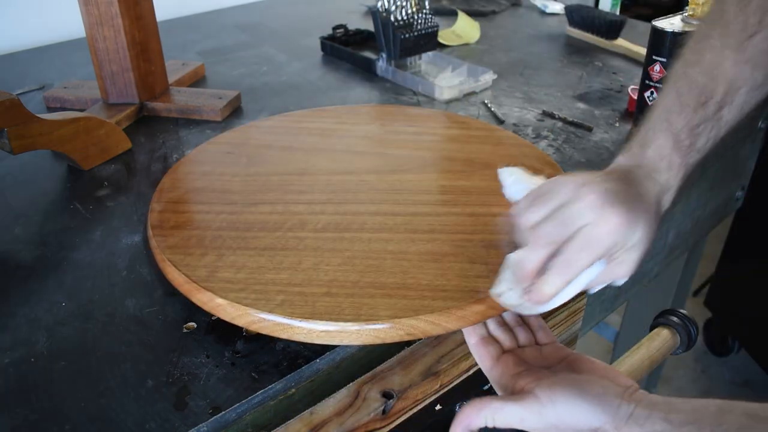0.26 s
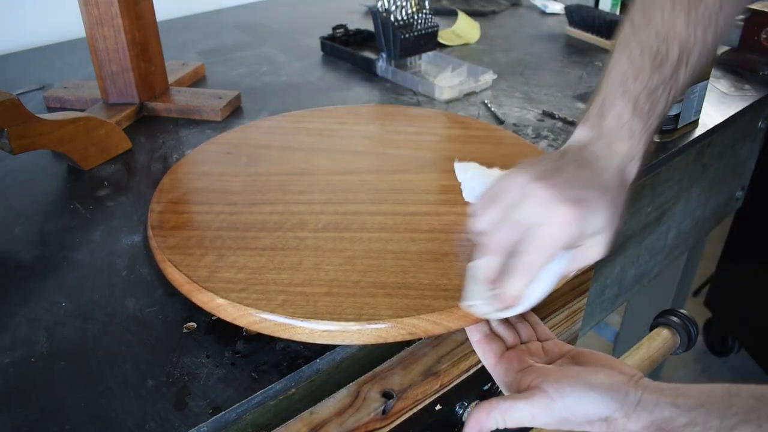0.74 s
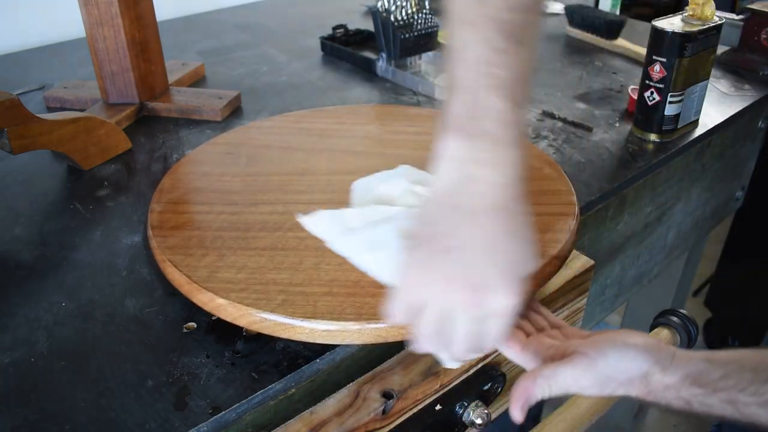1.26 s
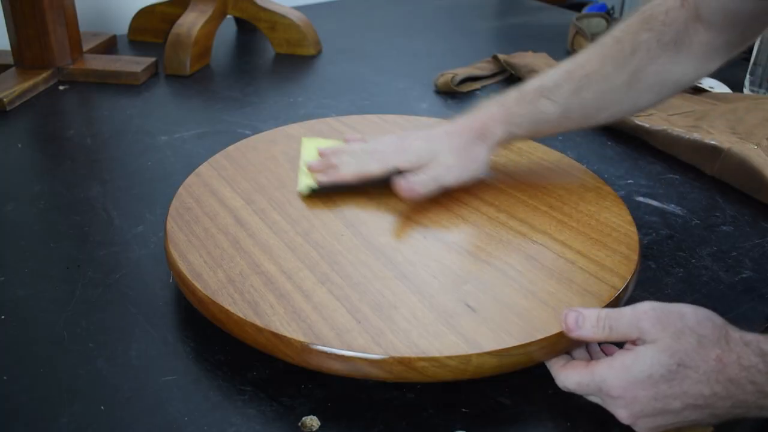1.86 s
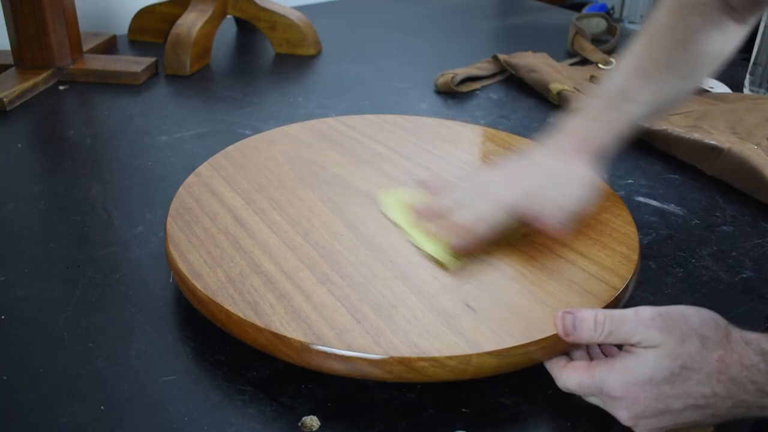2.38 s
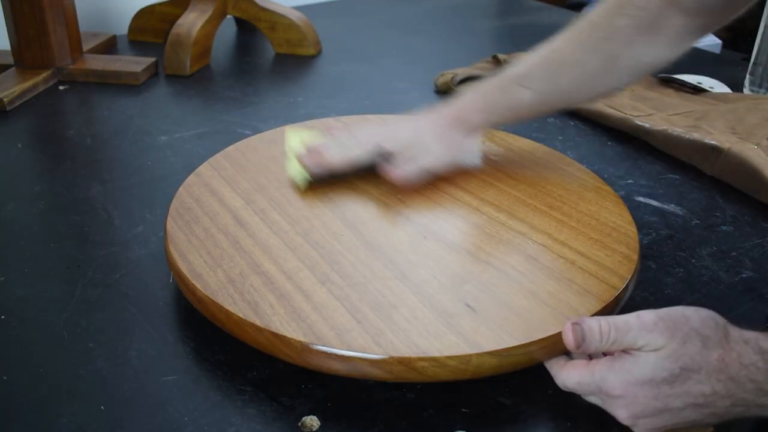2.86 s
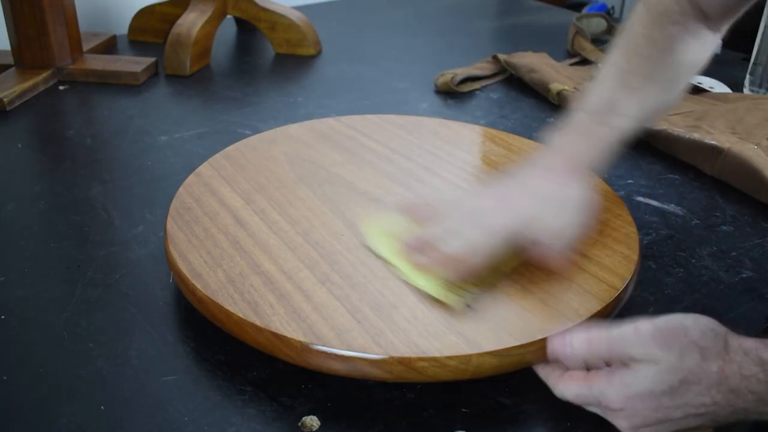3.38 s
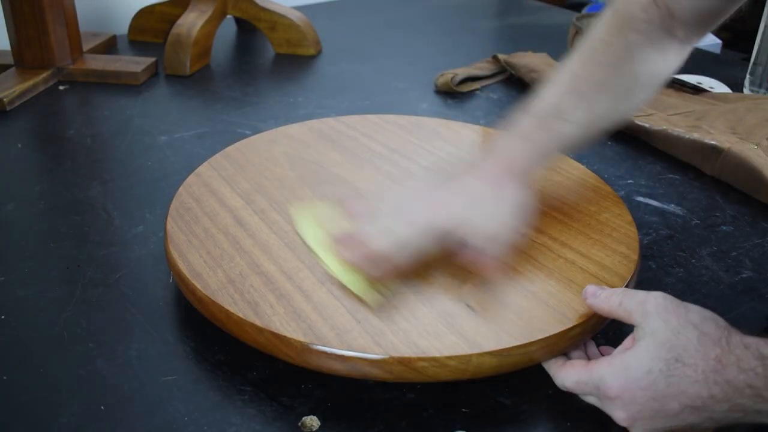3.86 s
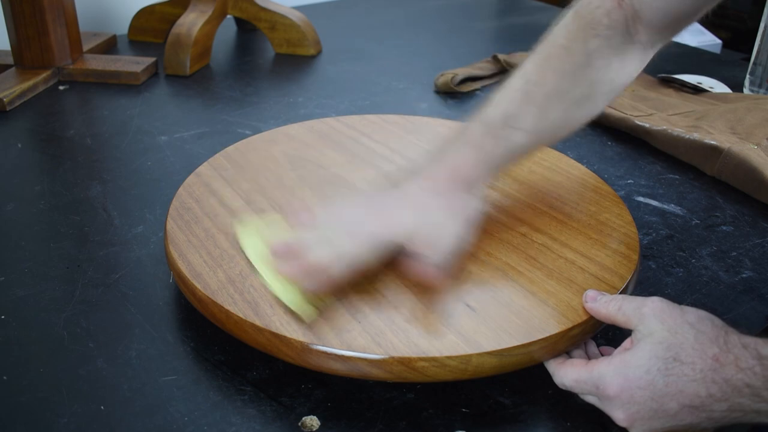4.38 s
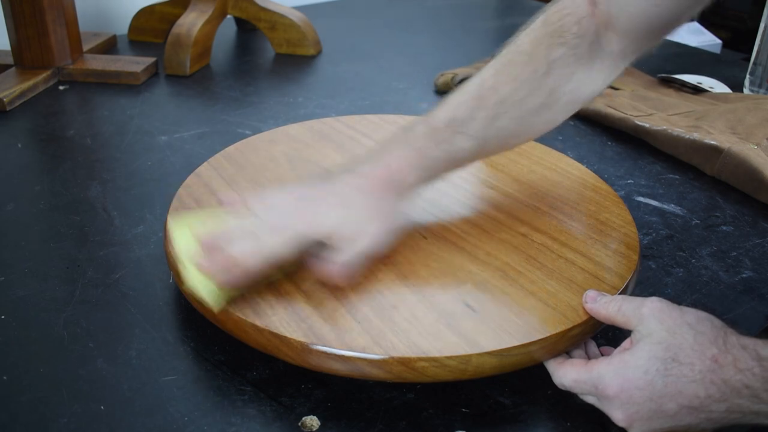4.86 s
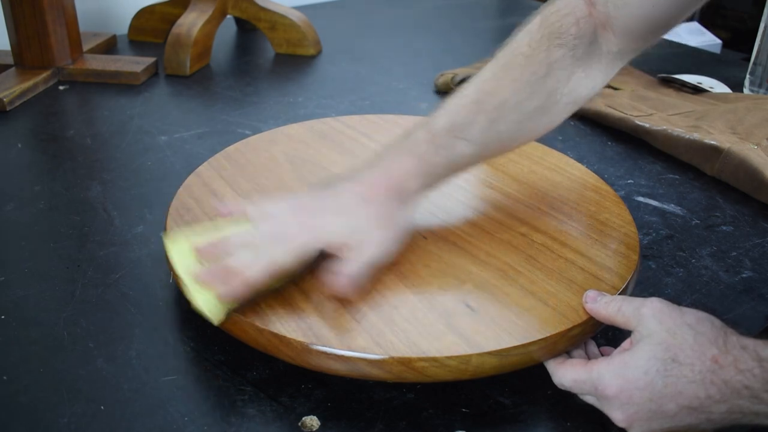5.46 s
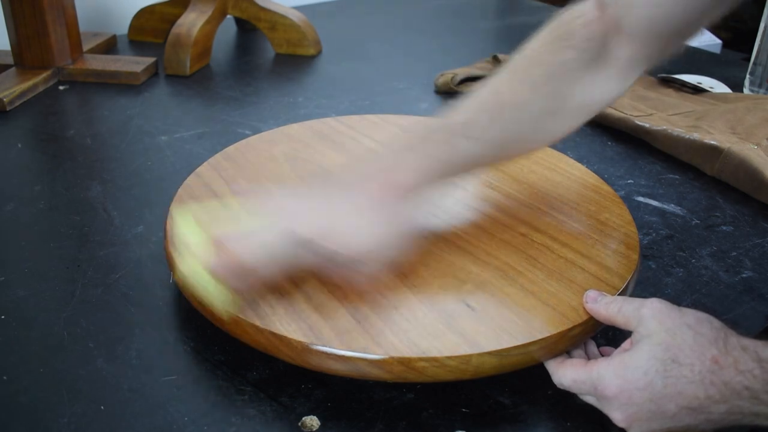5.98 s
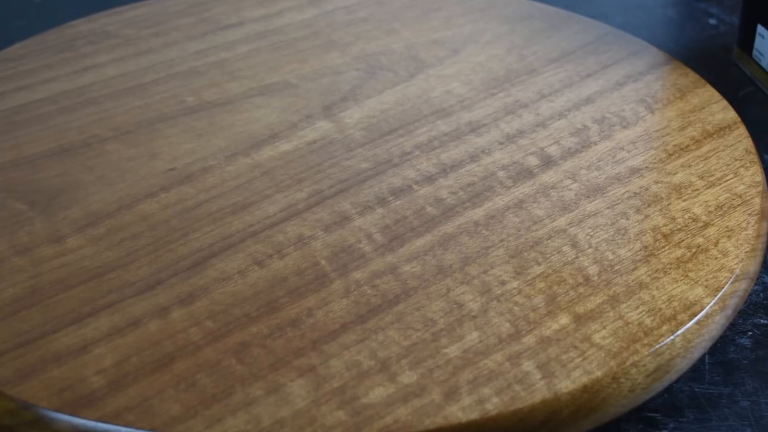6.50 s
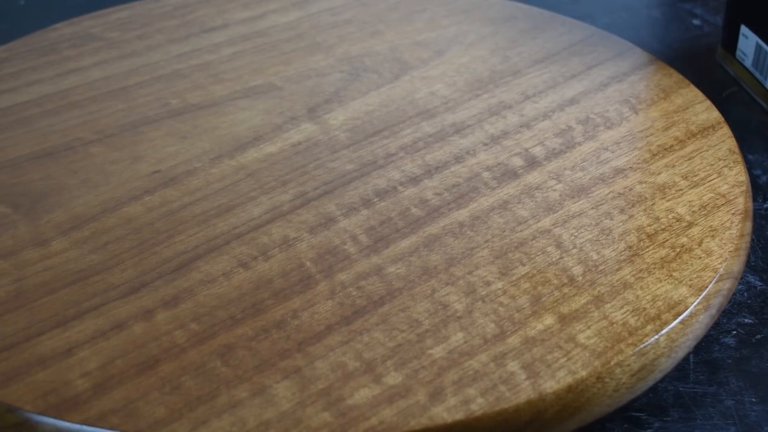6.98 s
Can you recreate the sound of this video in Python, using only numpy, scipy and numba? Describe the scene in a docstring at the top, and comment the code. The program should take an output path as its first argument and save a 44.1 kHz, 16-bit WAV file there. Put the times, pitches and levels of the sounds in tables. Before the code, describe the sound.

Close, dry sounds of wood being finished by hand in a workshop. First a cloth swishes briefly over a wooden board, which rumbles faintly and is bumped softly. Then comes about five seconds of light sanding: hissy strokes that quicken, dotted with tiny crunches of grit and a few soft knocks. The sanding stops abruptly and low room noise remains.

```python
"""A workshop, heard in three parts with sudden cuts between them. First a rag wipes finish over a round
wooden board on a turntable: its fibres catch and slip, which hisses and makes the board rumble. Then
fine sandpaper scuffs the board in quickening strokes, crushing loose grains. In both parts a hand
softly knocks the board. Last, only room and microphone hiss are left, on a small electrical offset."""
import sys
import numpy as np
from scipy import signal
from scipy.fft import rfft, irfft, next_fast_len
from scipy.io import wavfile
from scipy.ndimage import uniform_filter1d
from numba import njit

SR = 44100
rng = np.random.default_rng(int(sys.argv[2]) if len(sys.argv) > 2 else 0)


def dump(signal):
    """Clip the signal to [-1, 1] and save it as 16-bit WAV at the path in sys.argv[1]."""
    limited = np.clip(np.atleast_2d(signal).T, -1, 1)
    pcm = np.round(limited * 32767).astype(np.int16)
    wavfile.write(sys.argv[1], SR, pcm)


N = 319015
TIME = np.arange(N) / SR


def undb(db):
    return 10 ** (np.asarray(db) / 20)


def unit(x):
    return x / np.sqrt(np.mean(x ** 2))


def curves(table):
    """Join rows of (time, values...) with straight lines: one curve per value."""
    times, *columns = np.transpose(table)
    return [np.interp(TIME, times, column) for column in columns]


def colour(x, spectrum):
    """Shape x by (frequency [Hz], level [dB]) points, fading outside them; the result has strength 1."""
    hz, db = np.transpose(spectrum)
    size = next_fast_len(N)
    log_hz = np.log(np.maximum(np.fft.rfftfreq(size, 1 / SR), 1))
    outside = np.maximum(np.log(hz[0]) - log_hz, 0) + np.maximum(log_hz - np.log(hz[-1]), 0)
    gain = undb(np.interp(log_hz, np.log(hz), db) - 100 * outside)
    return unit(irfft(rfft(x, size) * gain, size)[:N])


@njit
def resonate(x, hz, width):
    """Let through a band `width` Hz wide around a pitch that may move."""
    y, mid, low = np.empty(len(x)), 0., 0.
    for i in range(len(x)):
        tuning, damping = np.tan(np.pi * hz[i] / SR), width / hz[i]
        swing = (mid + tuning * (x[i] - low)) / (1 + tuning * (tuning + damping))
        mid, low = 2 * swing - mid, low + 2 * tuning * swing
        y[i] = damping * swing
    return y


def band(x, hz, width):
    return unit(resonate(x, np.full(N, 1.) * hz, 1. * width))


def wander(per_second):
    """A smooth random wobble, roughly 1 in size."""
    hold = int(SR / per_second)
    steps = np.repeat(rng.standard_normal(N // hold + 1), hold)
    return 1.63 * uniform_filter1d(uniform_filter1d(steps, hold), hold)[:N]


def slips(spread_db, patchy_db):
    """Fibres or grains catch and let go all the time; a few slips are larger, and they come in patches."""
    size = np.minimum(rng.exponential(size=N), 5)
    return rng.standard_normal(N) * undb(spread_db * size + patchy_db * wander(120))


def strokes(table, ramp_s, speed_up, slow_down):
    """Hand strokes, turn to turn: gives loudness, rest (1 at a turn) and an early-to-late blender."""
    start, turn_db, early_db, late_db = np.transpose(table)[:4]
    length = np.diff(start)  # the last row only ends the stroke before it
    # speeding up and slowing down each take ramp_s plus a share of the stroke
    steady = np.c_[start[:-1] + ramp_s + speed_up * length, start[1:] - ramp_s - slow_down * length]
    corners = np.c_[start[:-1], steady].ravel()
    # loudness follows hand speed, so join gains, not decibels
    gain = np.interp(TIME, corners, undb(np.c_[turn_db, early_db, late_db][:-1].ravel()))
    rest = np.interp(TIME, corners, np.arange(len(corners)) % 3 == 0) ** 2

    def blend(early, late):
        return np.interp(TIME, steady.ravel(), np.c_[early, late][:-1].ravel())
    return gain, rest, blend


def rag(fibres):
    """Slipping cloth fibres hiss and make the turntable ring."""
    # wipes of the hand (start [s], level at the turn [dB], early level [dB], late level [dB], air [dB])
    wipes = [(0.02, -51, -39.5, -39.5, -6.5), (0.187, -50, -38, -35, -13.5),
             (0.421, -53, -41.5, -37.5, -8.5), (0.583, -51, -37, -35.5, -13.5), (0.782, -50, -41, -35, -17),
             (0.944, -48.5, -34, -41, -20), (1.312, -51, -47, -46, -24), (1.45, -55, -46, -44, -20)]
    # tone of the cloth (frequency [Hz], relative level [dB])
    cloth_tone = [(710, -55), (1200, -9), (1980, -10.5), (2120, -9), (3030, -10.5), (7140, -10),
                  (9500, -21.5), (12400, -29), (20900, -120)]
    # tone of its high, airy hiss (frequency [Hz], relative level [dB])
    air_tone = [(5000, -7), (8500, 2), (9970, -16), (13400, -20), (15600, -27)]
    # the turntable's ringing notes (pitch [Hz], width [Hz], relative level [dB])
    turntable_notes = [(885, 22, 2.5), (1260, 18, 2.5), (2150, 40, -3), (2690, 42, 4), (2840, 63, 4),
                       (3300, 110, 5.5), (3865, 70, 4.5), (4510, 52, 1), (5220, 48, -1)]
    gain, rest, blend = strokes(wipes, ramp_s=0.011, speed_up=0.1, slow_down=0.38)
    air_db = np.transpose(wipes)[4]
    # each note comes and goes as the rag moves over the board
    turntable = sum(undb(db + 1.5 * wander(11.9)) * band(fibres, hz, width)
                    for hz, width, db in turntable_notes)
    air = undb(blend(air_db, air_db) - 12 * rest) * colour(fibres, air_tone)  # a slow hand sounds duller
    return gain * (undb(-3) * colour(fibres, cloth_tone) + undb(-7.5) * unit(turntable) + air)


def board_rumble():
    """The rag's fibres drum on the board."""
    # loudness of the rumble (time [s], level [dB])
    levels = [(0, -44.5), (.12, -43.5), (.45, -46), (.88, -48), (.98, -42), (1.1, -45), (1.35, -46)]
    # tone of the board (frequency [Hz], relative level [dB])
    board_tone = [(88, -29), (150, -7), (878, 4.5), (1960, -4.5), (2090, -4), (2330, -10), (2750, -5),
                  (3000, -14), (3900, -34), (6600, -120)]
    return undb(curves(levels)[0]) * colour(slips(spread_db=2.5, patchy_db=-0.5), board_tone)


def cupped_hand(fibres):
    """The hollow under the hand rings, rising in pitch as it closes."""
    # the hollow's note (time [s], pitch [Hz], level [dB])
    hollow = [(0.0, 755, -52), (0.012, 714, -45.5), (0.114, 793, -36.5), (0.146, 861, -46),
              (0.202, 790, -50), (0.24, 885, -50), (0.275, 1240, -45), (0.312, 1200, -51),
              (0.36, 1040, -57)]
    hz, db = curves(hollow)
    return (TIME < hollow[-1][0]) * undb(db) * band(band(fibres, hz, width=190), hz, width=190)


def hiss(part):
    """Steady room and microphone noise that swells a little."""
    # tone of the noise, one list per part (frequency [Hz], relative level [dB])
    hiss_tones = [
        [(18, -51), (30, -12.5), (379, -2), (876, -1), (1970, -6), (3330, -19), (3600, -10), (7100, -22),
         (15600, -23)],
        [(18, -62), (30, -23.5), (1260, -10.5), (1480, -11), (1640, -12.5), (2770, -11.5), (6740, -7),
         (8310, -14), (15600, -41)],
        [(24, -45), (40, -18), (64, -21), (150, -8), (188, -9.5), (294, -3), (861, -6), (1910, -9.5),
         (2390, -10), (14100, -28.5), (15600, -36)],
    ]
    level_db = (-51, -51, -48)[part]
    return undb(level_db + 0.11 * wander(4.96)) * colour(rng.standard_normal(N), hiss_tones[part])


def knocks():
    """The hand bumps the board: a scuffed note that rises softly and dies fast."""
    # bumps (time [s], level [dB], pitch [Hz], time to fade by 60 dB [s])
    bumps = [(.96, -32, 644, .08), (1.015, -35, 425, 0.12), (1.287, -29, 370, 0.045), (4.78, -50, 950, .05),
             (5.32, -36, 1150, .03), (5.639, -34, 1270, 0.072), (6.393, -40, 1135, 0.096)]
    size, roughness = 8192, 0.51
    out, t = np.zeros(N), np.arange(size) / SR
    for start, db, hz, fade_s in bumps:
        scuff = unit(resonate(rng.standard_normal(size), np.full(size, 1. * hz), 0.27 * hz))
        note = (np.sin(2 * np.pi * hz * t) + roughness * scuff) / (1 + roughness)
        rise = 1 - np.exp(-t / 0.0026)
        i = int(start * SR)
        out[i:i + size] += undb(db - 60 * t / fade_s) * rise * note
    return out


def thin_ring():
    """A thin, stuttering ring near the end of the wiping."""
    start_s, end_s, fade_db_per_s, stutter_hz = 1.03, 1.285, 16, 21.5
    db = -44.5 - fade_db_per_s * (TIME - start_s) + 1.5 * wander(44.3)
    db += 5 * np.cos(2 * np.pi * stutter_hz * (TIME - 1.068))
    fade = np.clip(np.minimum(TIME - start_s, end_s - TIME) / .02, 0, 1)
    hz = 2140 + 22 * wander(39.64)
    return fade * undb(db) * np.sin(2 * np.pi * np.cumsum(hz) / SR)


def sandpaper():
    """One stream of slipping grit sounds in the paper, in the wood below and as a high, airy hiss."""
    # sanding strokes (start [s], level at the turn [dB], early level [dB], late level [dB],
    # air [dB], early wood [dB], late wood [dB]); air and wood are relative to the paper
    scuffs = [(1.25, -50, -43, -43, -14, -1, -7), (1.4, -55, -37.5, -34, -14, -13.5, -9.5),
              (1.889, -48.5, -32, -35, -9.5, -10, -11.5), (2.291, -48, -35, -32.5, -12, -17, -6.5),
              (2.792, -47, -31.5, -37.5, -13, -8, -9), (3.342, -56, -35, -30.5, -13, -12, -19),
              (3.742, -43.5, -31, -28, -13, -8, -15), (4.047, -42.5, -32.5, -25.5, -14, -12, -16),
              (4.312, -40.5, -26, -28, -14, -11, -13), (4.537, -37.5, -30.5, -26, -12.5, -12, -14),
              (4.723, -35.5, -27, -31.5, -14.5, -14, -12.5), (4.89, -41, -32.5, -31.5, -16.5, -15, -11),
              (5.032, -44, -30, -32, -14, -12, -12), (5.183, -46, -32.5, -30, -14.5, -10.5, -10),
              (5.343, -43.5, -29, -32, -13, -11, -11.5), (5.506, -46, -33.5, -29.5, -14, -9, -9.5),
              (5.66, -42, -28.5, -30.5, -12, -11.5, -13.5), (5.819, -43, -32.5, -30, -13.5, -12.5, -11),
              (5.98, -35, -28.5, -28, -10.5, -13, -9.5), (6.197, -37.5, -29.5, -28, -10.5, -10, -13.5),
              (6.423, -33.5, -27, -26, -11.5, -9.5, -10), (6.56, -40, -30, -30, -11, -10, -10)]
    # tone of the paper (frequency [Hz], relative level [dB])
    paper_tone = [(1760, -29.5), (3000, -14), (3470, -10), (5120, 1.5), (6940, 4), (8210, 1.5),
                  (10500, -15), (13600, -33), (22000, -120)]
    # tone of the wood (frequency [Hz], relative level [dB])
    wood_tone = [(290, -46), (500, -26.5), (987, -24.5), (1490, -16), (1700, -11.5), (3380, -4),
                 (4500, -7.5), (5850, -54), (9900, -120)]
    # tone of the airy hiss (frequency [Hz], relative level [dB])
    air_tone = [(5290, -57), (9000, -0.5), (13100, -7), (15600, -15)]
    # the board's own notes (pitch [Hz], width [Hz])
    board_notes = [(910, 19), (1490, 43)]
    # their loudness next to the paper (time [s], low note [dB], high note [dB])
    note_levels = [(1.4, -43, -35), (2.2, -47, -27.5), (2.45, -46, -36), (2.63, -40, -20.5),
                   (3.2, -41, -26), (3.55, -44.5, -36), (3.95, -41.5, -28), (4.15, -44, -36),
                   (4.4, -39.5, -27), (5.2, -39, -39), (5.6, -36.5, -34), (6.47, -35.5, -35)]
    gain, rest, blend = strokes(scuffs, ramp_s=0.0095, speed_up=0.25, slow_down=0.2)
    air_db, early_wood_db, late_wood_db = np.transpose(scuffs)[4:]
    grit = slips(spread_db=2.5, patchy_db=0.5)
    # a slow hand sounds duller: more wood and less air at each turn
    wood = undb(blend(early_wood_db, late_wood_db) + 7.5 * rest + 1.63 * wander(40)) * colour(grit, wood_tone)
    air = undb(blend(air_db + 0.5, air_db - 0.5) - 6.5 * rest) * colour(grit, air_tone)
    paper = undb(0.53 * wander(30)) * colour(grit, paper_tone)
    # the fingers bend the sheet, so a narrow ring of the paper drifts about
    bend_db = -18 + 2.5 * wander(15)
    bend_hz = np.clip(6300 * (1 + 0.16 * wander(9)), 3000, 10000)
    paper += undb(bend_db) * band(paper, bend_hz, width=510)
    notes = sum(undb(db + 2.2 * wander(12)) * band(grit, hz, width)
                for db, (hz, width) in zip(curves(note_levels), board_notes))
    return gain * (paper + wood + air + notes)


def hum_and_tones():
    """A low wavering hum, and faint thin tones that fade in and out."""
    # faint tones (start [s], end [s], pitch [Hz], level [dB])
    tones = [(1.546, 1.903, 250, -69), (4.45, 4.753, 1192, -58.5)]
    hum_hz = 117
    out = undb(-79 + 4 * wander(19)) * np.sin(2 * np.pi * hum_hz * TIME)
    for start, end, hz, db in tones:
        fade = np.clip(np.minimum(TIME - start, end - TIME) / 0.054, 0, 1)
        out += undb(db + 2.1 * wander(18.8)) * fade * np.sin(2 * np.pi * hz * TIME)
    return out


def crunches():
    """Each crushed grain gives a short ring of the wood and a bright crack of the paper."""
    # loose grains (time [s], ring peak [dB], ring pitch [Hz], crack peak [dB], fade time [s])
    grains = [(1.5618, -32.5, 2360, -29, 0.02), (1.563, -24.5, 4370, -30, 0.0097),
              (1.781, -42.5, 1510, -28, .008), (1.968, -22, 3180, -23, 0.0037),
              (1.994, -22.5, 3440, -16.5, 0.0067), (2.048, -25, 4500, -15.5, 0.0032),
              (2.067, -32, 3400, -20, 0.0055), (2.1781, -35, 3800, -19, 0.0025),
              (2.608, -21, 2350, -18, 0.0057), (2.6105, -23.5, 3900, -24, .006),
              (2.9299, -35, 3900, -26, 0.0033), (2.95, -25, 4500, -17, 0.0043),
              (3.1334, -24, 4300, -22, 0.0049), (3.419, -27.5, 2920, -35, 0.0092),
              (3.467, -20, 3840, -29, 0.0084), (3.604, -22, 4190, -28, 0.0046),
              (3.6595, -15, 3900, -18, 0.0064), (4.152, -17.5, 3820, -28, 0.0034),
              (4.195, -21.5, 3200, -17, 0.0087), (4.236, -18.5, 3500, -26, .004),
              (4.268, -25, 2990, -26, 0.0033), (4.379, -24, 3040, -17, 0.0031),
              (4.638, -24, 3500, -25, 0.0032), (4.678, -17, 4460, -15, 0.0098),
              (4.761, -20, 4540, -25, 0.0045), (4.83, -18.5, 4350, -21, .005),
              (5.065, -28, 4500, -28, .003), (5.955, -18.5, 4270, -14, 0.0058),
              (6.381, -19, 3500, -16, .003), (6.396, -21, 3470, -14, 0.0046)]
    size = 2048
    out, t = np.zeros(N), np.arange(size) / SR
    for start, ring_db, hz, crack_db, fade_s in grains:
        burst = rng.standard_normal(size) * np.exp(-t / fade_s) * np.minimum(t / 0.00037, 1)
        wood_hz, paper_hz = np.full(size, 1. * hz), np.full(size, 6800.)
        ring = resonate(resonate(burst, wood_hz, 0.38 * hz), wood_hz, 0.38 * hz)
        crack = resonate(resonate(burst, paper_hz, 3500.), paper_hz, 3500.)
        i = int(start * SR)
        out[i:i + size] += undb(ring_db) * ring / abs(ring).max() + undb(crack_db) * crack / abs(crack).max()
    return out


def scene():
    """Wiping, sanding, then the quiet room."""
    cuts_s, electrical_offset = (1.355, 6.4752), -.0116
    part = np.searchsorted(cuts_s, TIME)
    fibres = slips(spread_db=1.0, patchy_db=0.45)
    wiping = rag(fibres) + board_rumble() + cupped_hand(fibres) + thin_ring() + hiss(0)
    sanding = sandpaper() + crunches() + hum_and_tones() + hiss(1)
    quiet = hiss(2) + electrical_offset
    return (np.choose(part, [wiping, sanding, quiet]) + (part < 2) * knocks())[None]


def record(dry):
    """The camera's microphone loses the highest treble."""
    top_hz = 15714
    return signal.sosfilt(signal.ellip(14, .2, 100, top_hz, fs=SR, output="sos"), dry)


dry = scene()
out = record(dry)
dump(out)
```